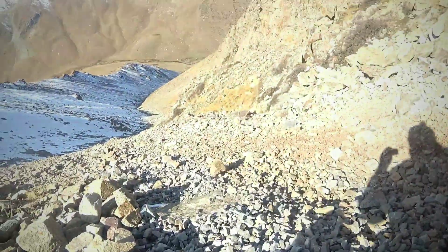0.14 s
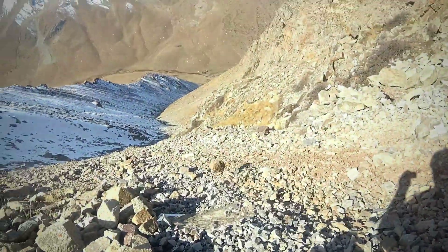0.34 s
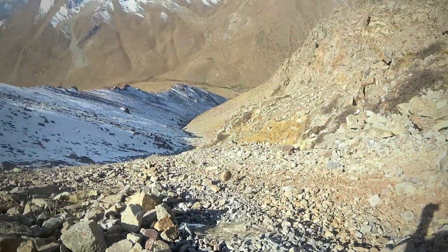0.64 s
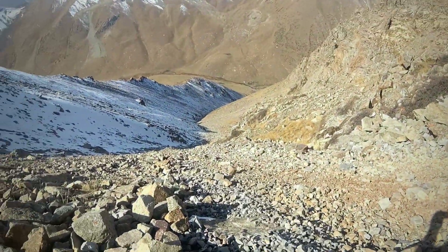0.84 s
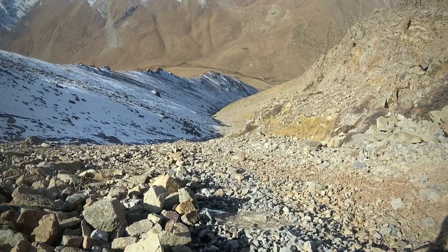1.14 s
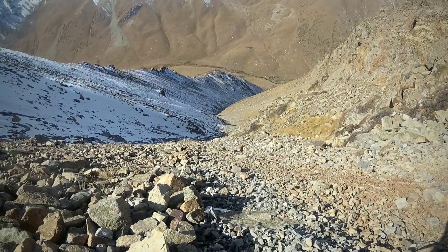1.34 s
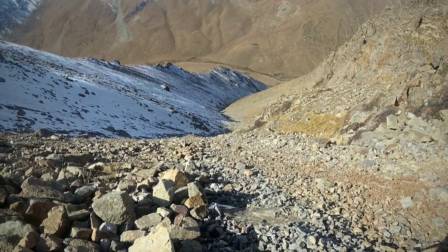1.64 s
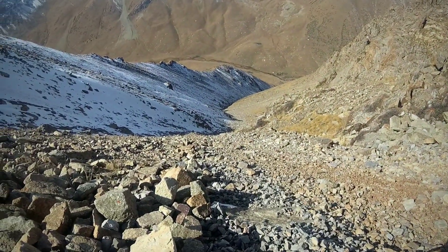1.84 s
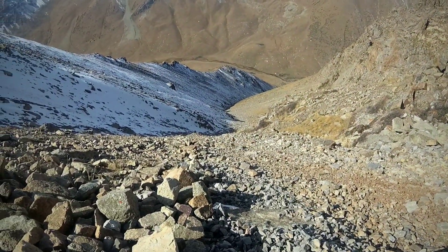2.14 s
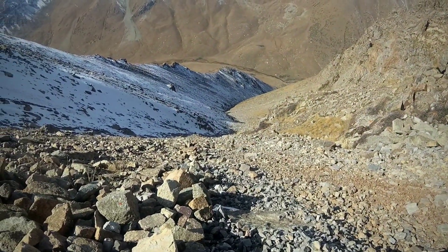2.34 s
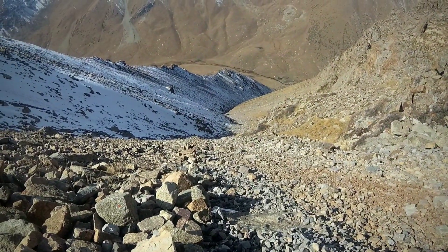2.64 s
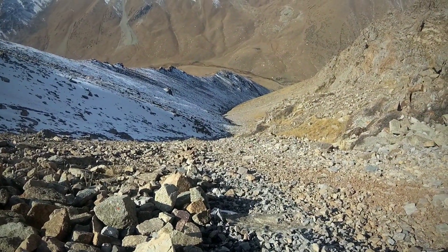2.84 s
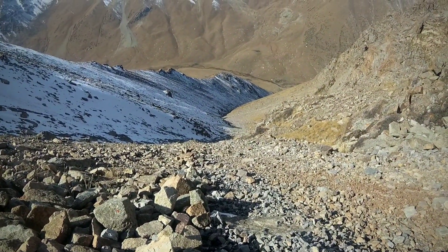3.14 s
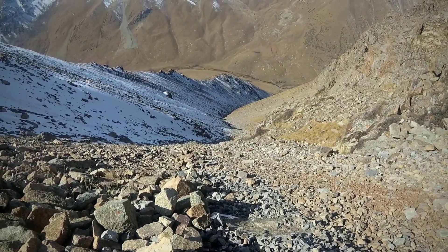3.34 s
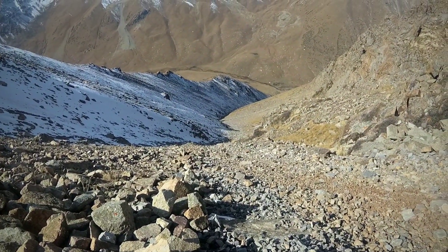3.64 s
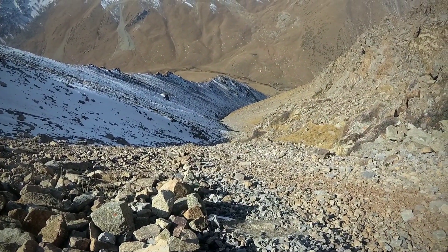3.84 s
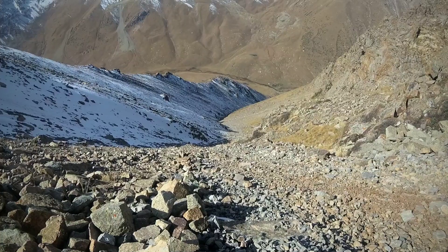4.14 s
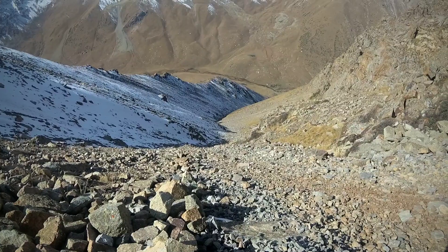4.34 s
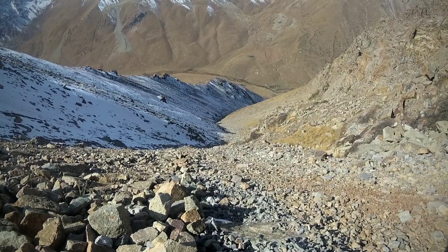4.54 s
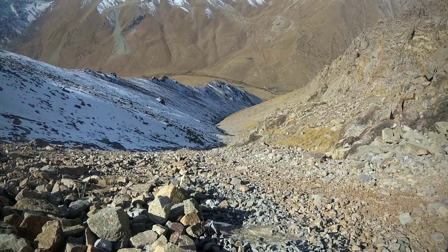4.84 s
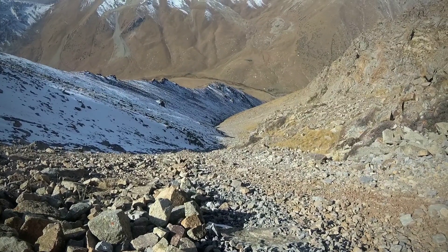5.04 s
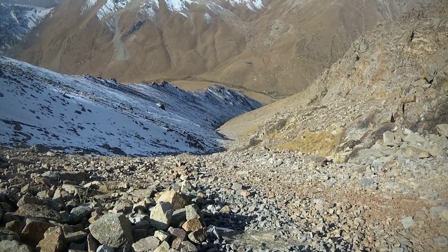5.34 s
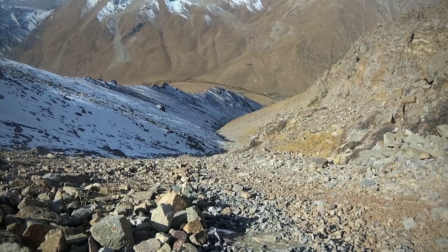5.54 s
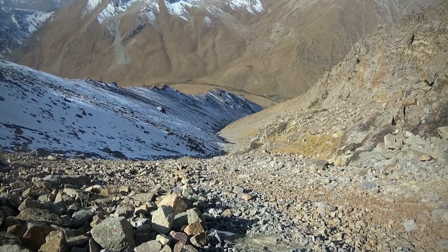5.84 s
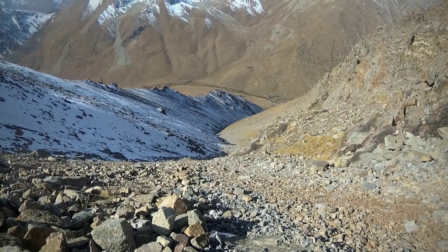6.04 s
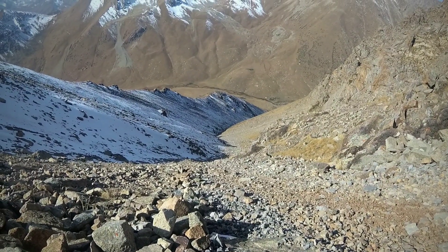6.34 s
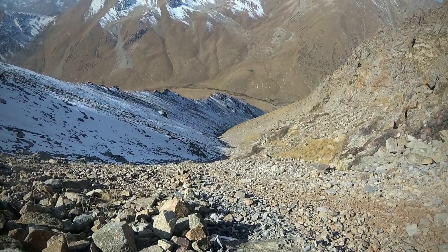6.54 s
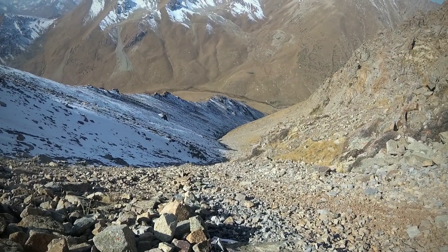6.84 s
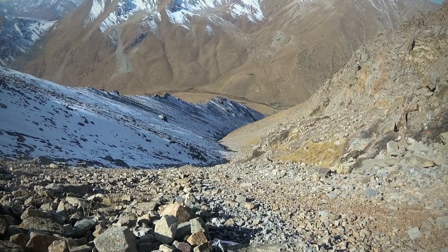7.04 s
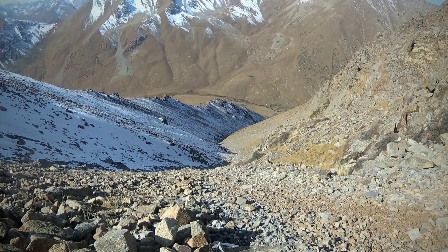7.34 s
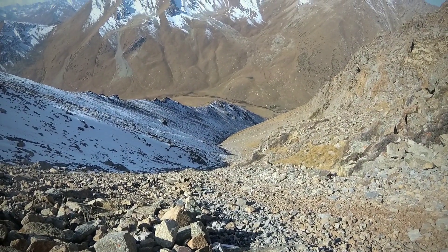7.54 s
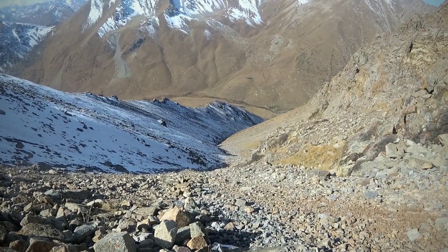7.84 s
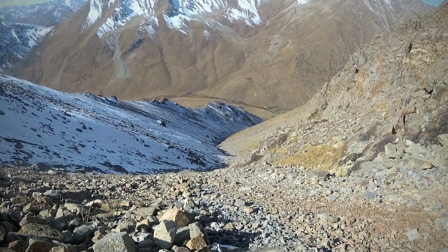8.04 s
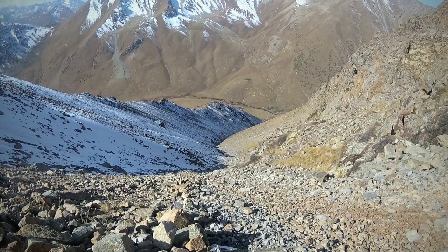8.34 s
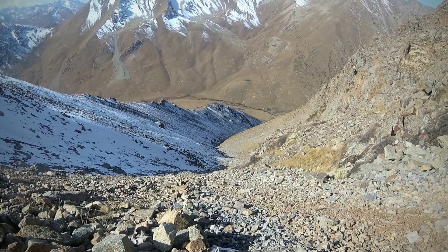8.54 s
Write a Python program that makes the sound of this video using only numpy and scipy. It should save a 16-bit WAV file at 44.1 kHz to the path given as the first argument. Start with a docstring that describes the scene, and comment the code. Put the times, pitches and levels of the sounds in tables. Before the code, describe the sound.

From 0 s a rock hits loose scree right by the microphone: a loud crunch, a spray of gravel and a dense run of bright, dry stone clacks. Another heavy splash comes at about 0.25 s, and more at 0.65 s, with small stones chattering continuously. A strong, hollow boulder knock lands at 1.4 s and another at 2.14 s, each short, with a dull ground thump and brief scatter off the slope. From 2.3 to 4 s the rattle thins to separate clicks and bounces, with clear knocks near 2.65 and 3.27 s. Between 4 and 6 s the impacts are distant and duller, notably around 4.3, 5.2 and 5.5 s, over a soft gravel hiss and faint low rolling. From 6 to 8.7 s sparse, tiny knocks and ticks fade into light breeze and microphone hiss in open mountain air.

```python
"""A scree slope in open mountain air, heard through a small hand-held stereo camera: a rock bounds away downhill.
It knocks on boulders (pushes of air, short rings, ground thumps) and splashes into gravel (swelling sprays of stones).
Single stones clack as short damped modes. A slide of small stones, ticks blurred with noise, hisses on, ever farther off.
Filtered noise makes the low rumble, the breeze and the microphone hiss. Echoes off the holder colour the stones."""
import sys
import numpy as np
from scipy import signal
from scipy.fft import rfft, irfft, next_fast_len
from scipy.io import wavfile
from scipy.ndimage import uniform_filter1d, map_coordinates

SR = 44100
rng = np.random.default_rng(int(sys.argv[2]) if len(sys.argv) > 2 else 0)


def dump(signal):
    """Clip the signal to [-1, 1] and save it as 16-bit WAV at the path in sys.argv[1]."""
    limited = np.clip(np.atleast_2d(signal).T, -1, 1)
    pcm = np.round(limited * 32767).astype(np.int16)
    wavfile.write(sys.argv[1], SR, pcm)


N = 383581

# The slide of loose stones. Each row: time in seconds, then gravel, grit and cobbles levels in dB before the surges.
SLIDE_LEVELS = [(0.0, -30.5, -30, -60), (0.12, -38.5, -52, -49), (0.29, -38, -47, -54),
                (0.58, -38, -46, -47.5), (1.11, -42, -54, -56), (1.35, -44.5, -52, -57.5),
                (1.65, -46, -59, -60), (1.94, -56.5, -63, -66), (2.1, -49, -56, -60.5),
                (2.45, -59, -69, -65.5), (2.7, -54, -62.5, -65), (3.25, -54.5, -61, -67.5),
                (3.66, -60.5, -67.5, -69.5), (5.3, -59, -66, -67.5), (6.3, -57.5, -61, -68.5),
                (6.93, -58.5, -67, -67), (7.29, -62.5, -68, -70.5), (8.7, -74.5, -75.5, -73.5)]
# Colour of the gravel. Each row: frequency in Hz, relative level in dB per Hz.
GRAVEL_COLOUR = [(530, -19), (900, -11), (1350, -18), (1900, -5), (2700, 1.5), (3500, 0.5), (5200, 3),
                 (10000, -5.5), (13000, -6), (22000, -120)]
# Colour of the fine grit. Each row: frequency in Hz, relative level in dB per Hz.
GRIT_COLOUR = [(5000, -5), (8500, 0), (9580, -3), (13000, -3), (14700, -1.5), (15800, -6)]
# Colour of the cobbles. Each row: frequency in Hz, relative level in dB per Hz.
COBBLE_COLOUR = [(130, -33), (220, -1.5), (692, -1.5), (754, -3.5), (893, -2.5), (1050, -2), (1400, 1),
                 (1820, -2.5), (3080, -120)]
# Far stones in the slide fuse to a hiss. Each row: time in seconds, share of hiss from 0 to 1.
SLIDE_BLUR = [(0, 0.63), (1.5, 0.38), (4, 0.59), (6, 0.81), (8.7, 0.57)]
# Air takes the treble of far gravel. Each row: time in seconds, share of dulled sound from 0 to 1.
AIR_DULLING = [(0, 0.13), (2, 0.7), (4.5, 0.95), (8.7, 0.8)]
# Heavy stones rolling out of sight. Each row: time in seconds, level in dB.
RUMBLE_LEVELS = [(0.0, -63), (0.17, -60), (0.31, -60), (0.51, -65), (0.82, -63), (0.97, -65), (1.31, -67),
                 (1.89, -71), (2.06, -67), (2.49, -78), (2.71, -78), (3.27, -63.5), (3.58, -76),
                 (3.92, -70), (4.12, -76), (4.72, -69.5), (5.72, -78), (6.05, -68), (6.32, -75),
                 (6.9, -66.5), (7.07, -70), (7.78, -77), (8.09, -70.5), (8.7, -79)]
# Colour of the rumble. Each row: frequency in Hz, relative level in dB per Hz.
RUMBLE_COLOUR = [(40, -32), (90, -14.5), (160, -0.5), (240, 0.5), (320, -11), (500, -48)]
# Colour of breeze and microphone hiss. Each row: frequency in Hz, relative level in dB per Hz.
AIR_COLOUR = [(15, -53), (25, -15), (64, -16.5), (248, -3), (542, -8.5), (1510, -15), (2390, -10.5),
              (2810, -8.5), (3130, -10), (4100, -13.5), (14600, -15.5), (15800, -51)]
# How alike left and right are in the breeze and hiss. Each row: frequency in Hz, likeness (1 is identical).
AIR_LIKENESS = [(25, .85), (60, 0.52), (200, 0.25), (600, 0.26), (3000, 0.05), (15000, .05)]
AIR_DB = -64
# Landings in gravel. Each row: start in seconds, gravel level in dB, time to die 60 dB in seconds,
# grit in dB over the gravel, cobbles in dB over the gravel.
SPLASH_EVENTS = [(-0.004, -23.5, 0.061, -13, -7), (0.041, -26.5, 0.061, -18, -37),
                 (0.078, -33, 0.088, -4, -11), (0.113, -32, 0.042, -1, -17),
                 (0.168, -34.5, 0.037, -15, -21), (0.179, -33.5, 0.14, -8, -15),
                 (0.215, -27, 0.55, -5, -9.5), (0.221, -26, 0.12, -12, -14), (0.248, -24.5, 0.098, -17, -5),
                 (0.2655, -19, 0.087, -18, -11), (0.277, -24, 0.093, -14, -20),
                 (0.609, -35, 0.039, -22, -6), (0.647, -26, 0.1, -5, -10), (0.654, -23.5, 0.13, -4, -14),
                 (0.695, -28, 0.079, -6, -22), (0.974, -37, 0.18, 1.5, -10), (0.9995, -36, 0.099, 1, -16),
                 (1.11, -32, 0.03, -6, -27), (1.185, -43.5, 0.1, -23, 4), (1.198, -35, 0.16, -7, -12),
                 (1.238, -35, 0.056, 3, -15), (1.245, -33, 0.18, -10, -9.5), (1.252, -25, 0.046, -10, -16),
                 (1.362, -36.5, 0.041, -6, -22), (1.392, -38, 0.05, -1.5, -19), (1.463, -38, 0.12, -6, -20),
                 (1.844, -33.5, 0.24, -4, -14.5), (1.872, -41.5, 0.06, -15, -2.5),
                 (1.928, -40, 0.32, -8, -14.5), (2.102, -36.5, 0.23, -25, -6), (2.14, -40, 0.035, -15, 1),
                 (2.19, -63.5, 0.43, -16, 8.5), (2.248, -53, 0.033, 8, -20), (2.292, -45, 0.059, -15, -15),
                 (2.317, -49, 0.04, -12, -20), (2.324, -47, 0.022, 2.5, -26), (2.361, -42, 0.03, -2, -27),
                 (2.378, -44, 0.03, -9, -12), (2.389, -48, 0.035, -2, -16), (2.437, -47, 0.06, -8, -25),
                 (2.446, -46.5, 0.07, -12, -31), (2.533, -38, 0.043, -16, -14),
                 (2.649, -39.5, 0.28, -6, -15), (2.651, -36.5, 0.097, -8, -9.5),
                 (2.738, -45, 0.17, -5, -21), (2.757, -45, 0.19, -4, -18), (2.929, -42.5, 0.11, -8, -16),
                 (3.002, -53, 0.17, 6, -29), (3.009, -48.5, 0.13, 6.5, -29), (3.024, -51, 0.05, 1, -27),
                 (3.117, -44, 0.12, -2.5, -11), (3.137, -45, 0.05, -16, -7.5), (3.267, -42, 0.093, -3, -6),
                 (3.369, -45.5, 0.093, -0.5, -1), (3.468, -51.5, 0.16, -4, -5),
                 (3.646, -47, 0.059, -12, -15), (3.754, -42, 0.046, -9, -14), (3.833, -56, 0.18, 8, -22),
                 (3.844, -40.5, 0.32, -13, -7.5), (4.079, -55, 0.1, -14, -6), (4.148, -50, 0.035, 0, -12),
                 (4.19, -51.5, 0.07, -1, -23), (4.218, -50, 0.046, -17, -15), (4.271, -48, 0.2, -10, -5),
                 (4.28, -39.5, 0.19, -11, -7), (4.659, -46, 0.1, -27, -19), (4.688, -50, 0.14, -16, -17),
                 (4.708, -43.5, 0.13, -19, -12.5), (4.738, -49, 0.12, -11, -14),
                 (4.747, -46.5, 0.046, -12, -17), (4.939, -43, 0.094, -11, -15), (5.21, -49, 0.075, -4, 2),
                 (5.428, -45, 0.1, -6.5, -11), (5.475, -51.5, 0.28, -10, -4),
                 (5.848, -50.5, 0.26, -16, -7.5), (5.92, -50, 0.16, -11, -7), (6.252, -53, 0.35, -21, -6),
                 (6.912, -55, 0.2, -15, -2.5), (6.948, -58, 0.15, -15, -8), (7.446, -56, 0.22, -16, -2),
                 (7.47, -67.5, 0.35, -16, 6.5), (7.869, -58, 0.13, -18, -5), (8.606, -61.5, 0.15, -16, -7)]
SPLASH_RISE_S, SPLASH_SUDDEN = 0.005, 1.36  # the swell, and how late in it the level leaps up (exponent)
# Rock on boulder. Each row: start in seconds, base level in dB, base pitch in Hz.
KNOCK_EVENTS = [(0.0055, -25.5, 466), (0.2488, -25, 994), (0.2797, -35, 730), (0.5257, -41.5, 243),
                (0.6603, -30.5, 670), (0.699, -39, 268), (1.013, -55, 231), (1.1896, -31, 780),
                (1.2425, -27, 990), (1.257, -34, 755), (1.4008, -14, 446), (1.4016, -29, 1000),
                (1.417, -38, 800), (1.443, -49, 196), (1.8757, -46, 790), (2.1021, -32.5, 610),
                (2.1158, -30.5, 490), (2.1429, -16, 420), (2.1452, -31, 1150), (2.1587, -40, 420),
                (2.1636, -35, 437), (2.175, -40, 350), (2.19, -48, 380), (2.205, -51, 420),
                (2.222, -50, 600), (2.232, -51, 550), (2.241, -52, 650), (2.2803, -44, 500),
                (2.289, -52, 620), (2.304, -51, 600), (2.34, -55, 315), (2.655, -27, 1200),
                (2.6804, -42, 850), (3.1379, -35, 805), (3.2704, -25.5, 700), (3.271, -40, 1300),
                (3.3071, -33, 1040), (3.3689, -43, 720), (3.3972, -39, 520), (3.399, -35.5, 496),
                (3.406, -42, 520), (3.8808, -36.5, 740), (3.9022, -47, 332), (3.9214, -46, 780),
                (4.3097, -37, 1170), (4.355, -46, 476), (4.946, -45.5, 605), (5.2142, -37, 384),
                (5.227, -49, 520), (5.24, -49, 477), (5.2165, -36, 990), (5.375, -45, 700),
                (5.43, -43.5, 614), (5.488, -31, 735), (5.5, -41, 1250), (5.8726, -50, 228),
                (6.27, -61, 500), (6.57, -51.5, 185), (6.832, -49.5, 356), (6.888, -57, 170),
                (6.926, -49, 190), (6.931, -41, 1150), (6.939, -55, 190), (7.051, -48, 810),
                (7.3038, -49, 900), (7.313, -54, 330), (7.4526, -42, 640), (7.575, -53, 620),
                (7.59, -59, 260), (7.665, -53, 500), (7.822, -52, 1150), (7.8443, -51, 950),
                (7.85, -60, 200), (7.887, -49, 1200), (7.957, -59, 182), (8.009, -60, 260),
                (8.0126, -48, 1010), (8.1204, -44.5, 1200), (8.232, -58, 206), (8.2311, -42, 1310),
                (8.4977, -49, 835), (8.606, -51, 1000), (8.6887, -49, 790)]
# Ringing modes of the rock. Each row: multiple of the base pitch, relative level in dB, multiple of the ring's cycles.
ROCK_MODES = [(1.1, -11.5, 1.4), (1.8, -25, 1.3), (2.3, -11, 1.2)]
# The slope scatters each knock. Each row: tail level in dB, time to die 60 dB in seconds, top frequency in Hz.
SLOPE_TAILS = [(-17, 0.13, 2500), (-21.5, 0.36, 660)]
KNOCK_CYCLES, KNOCK_HZ = 9.7, 450  # cycles to die 60 dB at this pitch, before each mode's multiple
LOW_RINGS_LONGER = 0.2  # exponent: lower knocks last more cycles
THUMP_LOW_HZ = 134  # the ground thumps no lower
# Single stones. Each row: start in seconds, base level in dB, base pitch in Hz, edge tick in dB over the base level.
CLACK_EVENTS = [(0.0385, -23, 4800, -18), (0.0452, -13, 4360, -22), (0.0615, -23, 5500, -18),
                (0.0815, -11.5, 6500, -8), (0.086, -25, 4500, -16), (0.0885, -20, 5500, -12),
                (0.1165, -16, 6050, -12), (0.1526, -34, 4480, -18), (0.182, -17, 4100, -20),
                (0.2515, -21, 1880, -17), (0.2682, -16, 5250, -21), (0.2695, -12, 6000, -21),
                (0.314, -19, 4850, -17), (0.3284, -19, 4240, -21), (0.384, -31, 4800, -21),
                (0.4199, -40, 3270, -20), (0.4344, -19.5, 5730, -10), (0.4504, -25, 4550, -15),
                (0.4793, -29, 2850, -9), (0.5412, -13, 5930, -14), (0.5585, -22, 3930, -25),
                (0.5603, -16.5, 3420, -29), (0.5655, -18.5, 5900, -14), (0.578, -27, 6300, -14),
                (0.6126, -15, 4200, -31), (0.6354, -16, 4550, -12), (0.6567, -16, 3930, -13),
                (0.7648, -21, 3900, -17), (0.8074, -23, 4180, -19), (0.8223, -22.5, 3180, -24),
                (0.8315, -27, 4000, -22), (0.8425, -20.5, 2890, -20), (0.8744, -36, 5260, -22),
                (0.9329, -23, 3900, -14), (0.9784, -22, 4540, 4), (1.0047, -20, 4250, -14),
                (1.1136, -15, 3960, -23), (1.144, -28, 3330, -16), (1.1544, -22.5, 5360, -14),
                (1.1815, -27, 6000, -20), (1.187, -19.5, 4010, -17), (1.2074, -15.5, 6150, -14),
                (1.227, -25, 3530, -17), (1.2416, -23, 4300, -8), (1.252, -16, 6000, -14),
                (1.255, -27, 4700, -19), (1.258, -22.5, 2900, -19), (1.2925, -25, 6000, -18),
                (1.334, -40, 1700, -25), (1.3375, -21, 4270, -24), (1.364, -29, 2800, -14),
                (1.378, -26, 5500, -7), (1.3925, -26, 6500, -4), (1.399, -29, 4930, -18),
                (1.447, -27, 4700, -23), (1.468, -21.5, 4100, -18), (1.4725, -25, 7500, -8),
                (1.4834, -35, 2710, -14), (1.499, -28, 5000, -12), (1.5056, -21, 5000, -6),
                (1.5413, -28, 4220, -24), (1.5994, -25, 4600, -30), (1.6084, -28, 3980, -23),
                (1.6799, -31, 5490, -18), (1.706, -30, 2740, -24), (1.7539, -23.5, 5800, -26),
                (1.8035, -35, 3200, -25), (1.8473, -25, 4610, -14), (1.8568, -29, 4650, -13),
                (1.8598, -21, 5000, -13), (1.8764, -27, 3990, -20), (1.898, -23.5, 3940, -24),
                (2.0108, -32, 4490, -18), (2.0263, -28, 3400, -19), (2.0688, -27, 4850, -17),
                (2.1027, -28, 2730, -23), (2.1155, -30.5, 2540, -22), (2.142, -32, 3400, 9.5),
                (2.1832, -38, 5000, -6), (2.2055, -44, 3000, -22), (2.2515, -42, 6000, 5),
                (2.2965, -33, 6300, -14), (2.3045, -38, 2980, -20), (2.3265, -29, 3900, -11),
                (2.3285, -35, 4300, -5), (2.3355, -36, 3800, -20), (2.351, -39, 6500, -12),
                (2.3585, -39, 5100, -14), (2.3665, -24, 3440, -10), (2.3824, -30, 6500, -14),
                (2.393, -36, 3460, -10), (2.4104, -30.5, 4550, -25), (2.4195, -33, 5500, -18),
                (2.4485, -36, 4500, -8), (2.458, -33, 5500, -12), (2.469, -38, 4200, -20),
                (2.4875, -39, 4500, -20), (2.5263, -29, 5390, -16), (2.5365, -29.5, 4550, -10),
                (2.5698, -31.5, 4780, -20), (2.613, -43, 5000, -14), (2.6522, -25, 3320, -21),
                (2.6555, -22.5, 3980, -20), (2.731, -34, 4200, -15), (2.761, -29, 5500, -14),
                (2.772, -34, 5270, -8), (2.78, -33, 6000, -12), (2.8404, -30.5, 4400, -27),
                (2.85, -32, 4530, -23), (2.9168, -31.5, 5350, -20), (2.9602, -34, 4620, -27),
                (2.988, -40, 4000, -18), (3.067, -44, 3300, -20), (3.1403, -29.5, 3400, -27),
                (3.1862, -28, 5670, -24), (3.2095, -32, 5820, -20), (3.3712, -31, 2700, -15),
                (3.3975, -25.5, 3210, 1), (3.425, -34, 4360, -27), (3.444, -36, 3870, -22),
                (3.5906, -40, 3870, -24), (3.6481, -41, 5200, -25), (3.6864, -56, 2760, -15),
                (3.712, -46, 3000, -20), (3.7568, -41, 2740, -21), (3.8352, -35, 6490, -13),
                (3.8505, -23.5, 3320, -26), (3.9594, -39, 4170, -19), (3.9833, -41, 5400, -22),
                (4.0791, -39, 4760, -23), (4.088, -49, 1700, -25), (4.099, -46, 4300, -20),
                (4.122, -45, 4000, -20), (4.152, -43, 2630, -10), (4.186, -38, 5300, -20),
                (4.252, -44, 4500, -20), (4.1939, -40, 3990, -14), (4.286, -46, 4570, -18),
                (4.3388, -40, 4400, -30), (4.407, -46, 2300, -25), (4.517, -39, 2590, -26),
                (4.528, -43, 1870, -25), (4.566, -49, 2800, -20), (4.609, -47, 1680, -25),
                (4.6243, -42, 3400, -25), (4.634, -40, 3280, -25), (4.6624, -31, 4150, -29),
                (4.6805, -38, 3300, -28), (4.9234, -39, 5750, -24), (4.9422, -33, 4340, -21),
                (4.9599, -29.5, 4100, -23), (5.0429, -37.5, 4540, -20), (5.2155, -38, 2000, -14),
                (5.4225, -43, 3500, -20), (5.4268, -37, 2780, -19), (5.4304, -42, 4080, -21),
                (5.5364, -47, 3970, -23), (5.7545, -38, 3330, -23), (5.927, -44, 4880, -16),
                (6.0937, -31, 3060, -33), (6.5308, -42, 4530, -21), (6.56, -40.5, 2830, -24),
                (6.6653, -47, 4440, -17), (6.8324, -55, 2160, -22), (6.926, -40.5, 2080, -19),
                (7.3529, -47, 4010, -22), (7.4283, -50, 3230, -22), (7.6145, -46, 2800, -20),
                (7.727, -46, 2920, -26), (7.7484, -45, 3980, -14), (7.9297, -43, 5260, -23),
                (8.0451, -52, 4530, -18), (8.191, -52, 3360, -20), (8.2306, -44, 3000, -19),
                (8.2535, -44.5, 3000, -21), (8.2935, -49, 3430, -24), (8.4792, -51, 2760, -6),
                (8.5124, -51, 4660, -4), (8.5961, -51, 3640, -20), (8.621, -51, 2220, -19)]
# Ringing modes of a stone. Each row: multiple of the base pitch, relative level in dB, cycles to die 60 dB.
STONE_MODES = [(.82, -7, 21), (1.0, 0, 24.5), (1.17, -4.5, 28), (1.45, -2, 8), (1.9, -18, 10)]
STONE_DETUNE = 0.035  # log spread of each mode's pitch
CHATTER_S, CHATTER_DB, CHATTER_FADE_DB = 0.006, -5, 22  # rebounds: time span, level change, further fade over the span
STRAY_DB, STRAY_SCATTER_DB = 7, 1  # smaller stones at random: level over the gravel, random extra
STRAY_HZ, STRAY_SPREAD, STRAY_EDGE_DB = 4480, 0.26, -16  # their middle pitch, its log spread, and edge tick
# Echoes off whoever holds the camera. Each row: delay in milliseconds, relative level in dB, phase turn in radians.
HOLDER_ECHOES = [(0.82, -30, 0.31), (1.57, -12, 1.48), (2.1, -22.5, 2.2)]
# The echoes firm up as the camera turns downhill. Each row: time in seconds, gain of the echoes in dB.
HOLDER_FACING = [(0, -9), (0.8, -10), (2, -0.5), (5.5, 1), (8.7, 2)]
ECHO_LOW_HZ, ECHO_TOP_HZ = 920, 10000  # a body throws back mostly this band
# How much the two ports differ. Each row: frequency in Hz, side to mid in dB before a fixed 3 dB lift.
PORT_WIDTH = [(60, -26), (110, -13), (200, -25), (380, -24), (700, -23), (1290, -23), (2380, -19.5),
              (4400, -14), (8120, -5.5), (15000, -9.5)]
# Balance of the ports. Each row: frequency in Hz, left over right in dB.
PORT_LEAN = [(60, -4), (110, -1), (200, -1.5), (380, -1), (700, -1.0), (1290, 0), (2380, -1), (4400, 0.5),
             (8120, -1.5), (15000, -1)]
# Phase between the ports. Each row: frequency in Hz, radians by which the left port leads.
PORT_LEAD = [(4500, 0.044), (6200, 0.45), (8300, -0.77), (11000, -0.66), (14000, -0.2)]
TOP_HZ = 15600  # the camera's band limit


def amp(db):
    """Turn decibels into a plain gain."""
    return 10 ** (np.asarray(db) / 20)


def unit(x):
    """Scale to an rms of 1."""
    return x / np.sqrt(np.mean(x ** 2) + 1e-20)


def along(points, hz):
    """Read a curve of (Hz, value) points on a log axis."""
    f, v = np.transpose(points)
    return np.interp(np.log(hz + 1), np.log(f + 1), v)


def over_time(points):
    """Read a curve of (seconds, value) points at every sample."""
    return np.interp(np.arange(N) / SR, *np.transpose(points))


def filtered(x, response):
    """Multiply the spectrum of x by a response that depends on frequency."""
    m = next_fast_len(N + 8192)
    return irfft(rfft(x, m) * response(np.fft.rfftfreq(m, 1 / SR)), m)[..., :N]


def wobble(rate):
    """A smooth random curve with this many knots a second."""
    knots = rng.standard_normal(int(N * rate / SR) + 4)
    return map_coordinates(knots, [np.arange(N) * rate / SR])


def place(waves, s, length):
    """Add each row of waves into one track at its start in seconds."""
    at = (s * SR).astype(int)[:, None] + np.arange(waves.shape[1])
    return np.bincount(at.ravel(), waves.ravel(), length)[:N]


def rings(s, db, hz, t60, size, attack):
    """Struck bodies ring as damped sines: start, level, pitch and decay for each; size in samples, attack in seconds."""
    t = np.arange(size) / SR
    sine = np.sin(2 * np.pi * hz[:, None] * t)
    decay = np.exp(-np.log(1000) * t / t60[:, None])
    onset = 1 - np.exp(-t / attack)
    return place(sine * amp(db)[:, None] * decay * onset, s, N)


def pushes(s, db, hz, size):
    """A body stopping dead gives one compact push of air, about a cycle and a half long."""
    turns = np.arange(size) / SR * hz[:, None] - .55
    bump = np.exp(-((turns - .1) / 0.61) ** 2)
    return place(amp(db)[:, None] * np.cos(2 * np.pi * turns - .6) * bump, s, N + size)


def stones(when, size_db, size, spectrum, hz, spread, cycles, blur):
    """Countless stones of one size class tick at random over a noise blur of farther ones."""
    draw = rng.standard_normal((len(when), 2))
    pitch_hz = np.clip(hz * np.exp(spread * draw[:, 0]), 60, 15000)
    t60 = cycles * np.exp(0.38 * draw[:, 1]) / pitch_hz
    ticks = rings(when, size_db, pitch_hz, t60, size=size, attack=1e-4)
    # take off the ticks' own mean colour, then give ticks and blur the colour of the class
    f, power = signal.welch(ticks, SR, nperseg=256)
    colour = lambda g: amp(along(spectrum, g))
    near = filtered(ticks, lambda g: colour(g) / np.sqrt(np.interp(g, f, power) + power.max() / 300))
    far = filtered(rng.standard_normal(N), colour)
    share = np.clip(blur, 0, 1)
    return np.sqrt(1 - share) * unit(near) + np.sqrt(share) * unit(far)


def size_classes(count, scatter_db, blur):
    """One collision rings two gravel modes and grit at once; cobbles are fewer and lower."""
    when = rng.random(count) * N / SR
    size_db = scatter_db * np.minimum(rng.exponential(1, count), 2.8)
    gravel = stones(np.tile(when, 2), np.tile(size_db, 2), 150, GRAVEL_COLOUR, 3980, 0.474, 14.6, blur)
    far = np.clip(over_time(AIR_DULLING), 0, 1)
    dulled = filtered(gravel, lambda hz: 1.23 / (1 + (hz / 6500) ** 4))
    gravel = (1 - far) * gravel + far * dulled
    grit = stones(when, size_db, 64, GRIT_COLOUR, 11620, 0.207, 29, blur)
    cobbles = stones(when[::4], 0.75 * size_db[::4], 400, COBBLE_COLOUR, 500, 0.752, 5.2, blur)
    return np.array([gravel, grit, cobbles])


def slide():
    """The loose stones run on in uneven little surges."""
    t = np.arange(N) / SR
    s, *levels = np.transpose(SLIDE_LEVELS)
    level_db = np.array([np.interp(t, s, level) for level in levels])
    surge_db = 0.76 * wobble(30) + 1.35 * wobble(90)
    trim_db = np.array([[.8], [.3], [.3]])
    rattle = size_classes(count=9000, scatter_db=6.0, blur=over_time(SLIDE_BLUR))
    return np.sum(amp(level_db + surge_db + trim_db) * rattle, axis=0)


def rumble():
    """Heavy stones rolling far down the slope give dull lumps of low sound, made from noise."""
    low = filtered(rng.standard_normal(N), lambda hz: amp(along(RUMBLE_COLOUR, hz)))
    lumps = amp(2.7 * wobble(17) + 1.0 * wobble(7)) * low
    return amp(over_time(RUMBLE_LEVELS)) * unit(lumps)


def air():
    """A faint breeze and microphone hiss: noise shared between left and right by their likeness."""
    turn = lambda hz: np.arccos(np.clip(along(AIR_LIKENESS, hz), -1, 1)) / 2
    shape = lambda hz: amp(along(AIR_COLOUR, hz)) * [np.cos(turn(hz)), np.sin(turn(hz))]
    mid, side = filtered(rng.standard_normal((2, N)), shape)
    return amp(AIR_DB) * unit(np.array([mid + side, mid - side]))


def splashes():
    """Each landing throws up a dense spray of stones that swells fast and patters out."""
    power, t = np.zeros((3, N + SR)), np.arange(SR // 2) / SR
    swell = np.minimum(t / SPLASH_RISE_S, 1) ** SPLASH_SUDDEN
    for s, db, t60, grit_db, cobbles_db in SPLASH_EVENTS:
        shape = swell * amp(-60 * np.maximum(t - SPLASH_RISE_S, 0) / max(t60, .01))
        class_db = db + np.array([[0], [grit_db], [cobbles_db]])
        at = round(s * SR)
        # a landing that starts before time zero loses its first samples
        power[:, max(at, 0):at + len(t)] += (amp(class_db) * shape[max(-at, 0):]) ** 2
    spray = size_classes(count=6000, scatter_db=0.5, blur=0.58) * amp(2.35 * wobble(150))
    return np.sum(np.sqrt(power[:, :N]) * spray, axis=0)


def slope_scatter(direct):
    """The slope around throws back a bright short tail and a dull rolling one, each a decaying noise."""
    t, out = np.arange(SR // 3) / SR, direct
    for level_db, t60, top_hz in SLOPE_TAILS:
        tail = rng.standard_normal(len(t)) * amp(-60 * t / t60) * (t > .004)
        wet = signal.fftconvolve(direct, tail / np.linalg.norm(tail))[:N]
        out = out + amp(level_db) * filtered(wet, lambda f: 1 / (1 + (f / top_hz) ** 4))
    return out


def knocks():
    """Rock on boulder: a push of air, a dull short ring and the thump of the ground under it."""
    s, db, hz = np.transpose(KNOCK_EVENTS)
    cycles = KNOCK_CYCLES * (KNOCK_HZ / hz) ** LOW_RINGS_LONGER
    ring = sum(rings(s, db + level_db + 7.5, hz * ratio, cycles * life / (hz * ratio), size=2000, attack=0.0021)
               for ratio, level_db, life in ROCK_MODES)
    thump_hz = np.maximum(hz * 0.546, THUMP_LOW_HZ)
    thump = rings(s, db - 4.5, thump_hz, cycles * 1.1 / hz, size=2500, attack=0.0017)
    push = pushes(s, db - .8, hz * 1.286, size=900)
    return slope_scatter(push - ring + thump)


def strays(count):
    """Rows for lesser stones that hop out of the slide at random, their level following the gravel's."""
    when = rng.random(count) * (N - 1) / SR
    size, pitch = rng.exponential(1, count), rng.standard_normal(count)
    gravel_db = np.interp(when, *np.transpose(SLIDE_LEVELS)[:2])
    level_db = gravel_db + STRAY_DB + STRAY_SCATTER_DB * np.minimum(size, 3)
    pitch_hz = STRAY_HZ * np.exp(STRAY_SPREAD * pitch)
    return np.transpose([when, level_db, pitch_hz, np.full(count, STRAY_EDGE_DB)])


def chatter(rows, count):
    """Each stone strikes again a few times before it settles, weaker the later it comes."""
    late = rng.random((len(rows), count))
    again = [rows + np.outer(u, [CHATTER_S, -CHATTER_FADE_DB, 0, 0]) + [.001, CHATTER_DB, 0, 0] for u in late.T]
    return np.vstack([rows, *again])


def clacks():
    """A stone pushes the air and rings briefly at slightly varied modes; its sharp edge adds a treble tick."""
    s, db, hz, edge_db = np.transpose(chatter(np.vstack([CLACK_EVENTS, strays(count=70)]), count=3))
    draw = rng.standard_normal((len(s), len(STONE_MODES) + 1, 2))
    body = 0
    for k, (ratio, level_db, cycles) in enumerate(STONE_MODES):
        mode_db = db + level_db - 1.5 + 0.98 * draw[:, k, 0]
        mode_hz = hz * ratio * np.exp(STONE_DETUNE * draw[:, k, 1])
        body = body + rings(s, mode_db, mode_hz, cycles / (hz * ratio), size=260, attack=1e-4)
    edge_hz = 11500 * np.exp(0.17 * draw[:, -1, 0])
    edge = rings(s, db + edge_db, edge_hz, np.full(len(s), .003), size=200, attack=1.5e-4)
    return body + edge + pushes(s, db - 5.5, hz * 1.5, size=60)


def holder(x):
    """Short echoes off the body behind the camera draw fixed bands through every stone sound."""
    band = lambda hz: 1 / (1 + (ECHO_LOW_HZ / (hz + 1)) ** 2) / (1 + (hz / ECHO_TOP_HZ) ** 4)
    delays = lambda hz: sum(amp(db) * np.exp(1j * (turn - 2 * np.pi * hz * ms / 10 ** 3))
                            for ms, db, turn in HOLDER_ECHOES)
    echo = filtered(x, lambda hz: band(hz) * delays(hz))
    return x + amp(over_time(HOLDER_FACING)) * echo


def ports(mid):
    """The camera body smears the sound differently at each port, most in the treble; the smear drifts."""
    hz, t, z = signal.stft(mid, SR, nperseg=128)
    drift = uniform_filter1d(rng.standard_normal((2,) + z.shape), 12, axis=2)
    turn = np.exp(1j * np.arctan2(*drift))
    width = amp(along(PORT_WIDTH, hz) + 3.0)[:, None]
    side = signal.istft(z * turn * width, SR, nperseg=128)[1][:N]
    sign = np.array([[1], [-1]])  # left, right
    balance = lambda f: amp(sign * along(PORT_LEAN, f) / 2) * np.exp(1j * sign * along(PORT_LEAD, f) / 2)
    return filtered(np.array([mid + side, mid - side]), balance)


def scene():
    """All stone sounds pass the capsules, the holder's echoes and the ports; breeze and hiss are added last."""
    heard = slide() + rumble() + splashes() + knocks() + clacks()
    # the small capsules weaken the deep bass of the blows
    capsule = signal.butter(2, 110, "high", fs=SR, output="sos")
    return ports(holder(signal.sosfilt(capsule, heard))) + air()


def record(dry):
    """The camera keeps nothing above its band limit."""
    return filtered(dry, lambda hz: hz < TOP_HZ)


dry = scene()
out = record(dry)
dump(out)
```